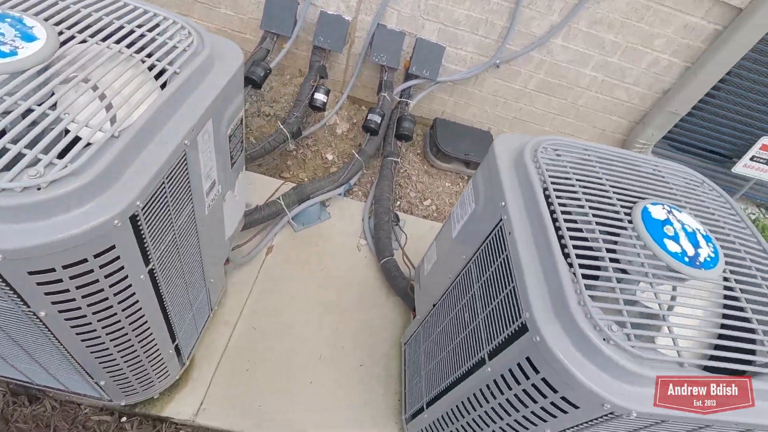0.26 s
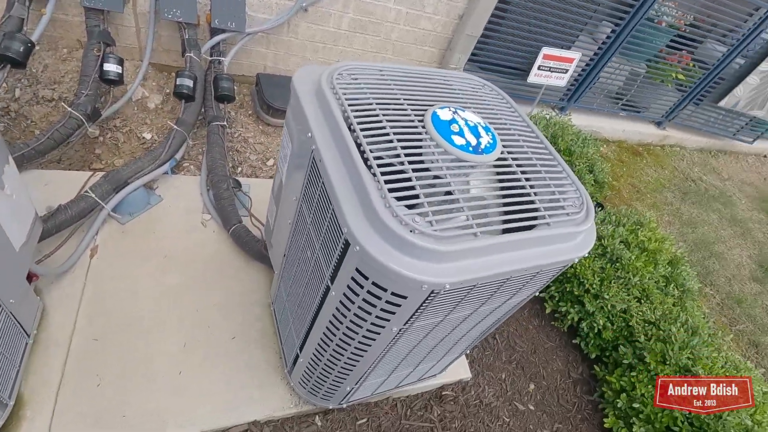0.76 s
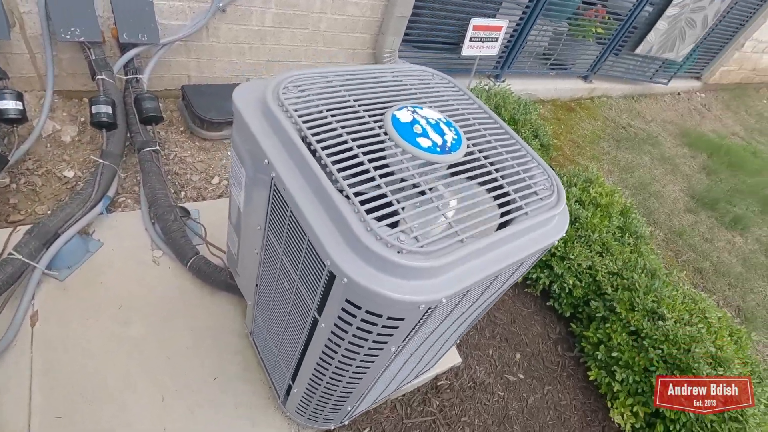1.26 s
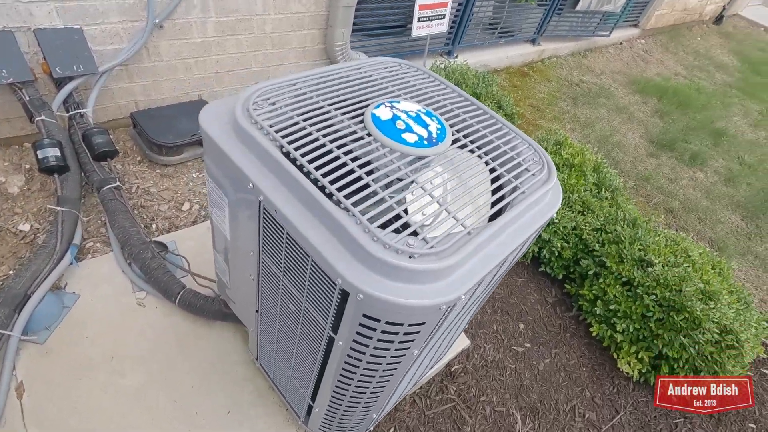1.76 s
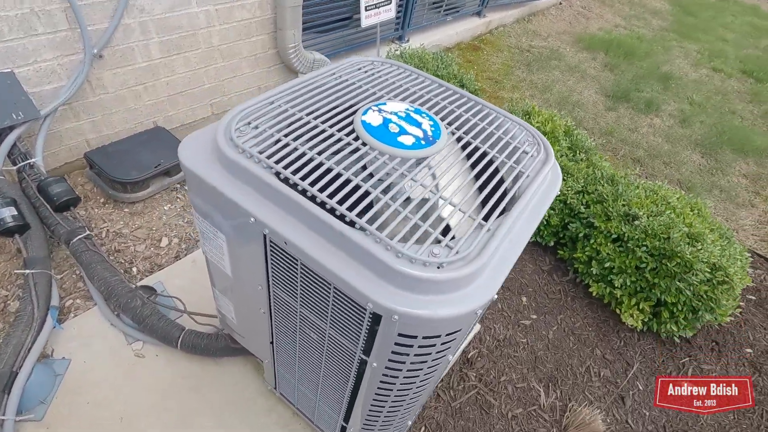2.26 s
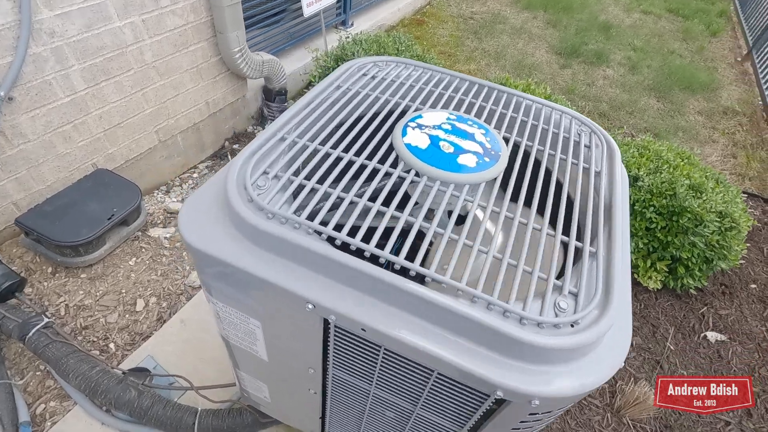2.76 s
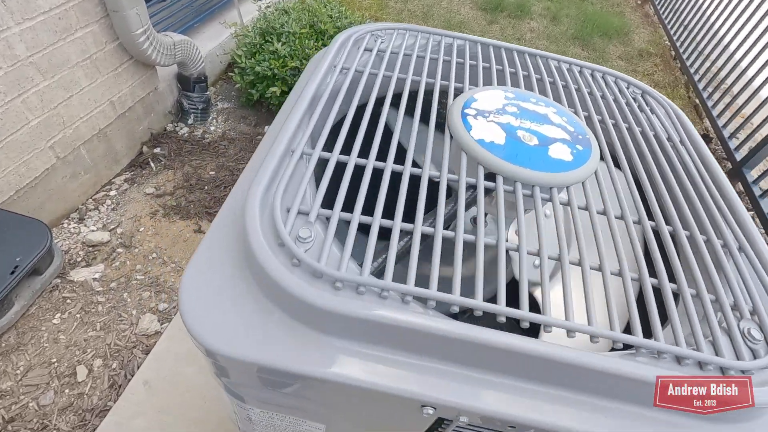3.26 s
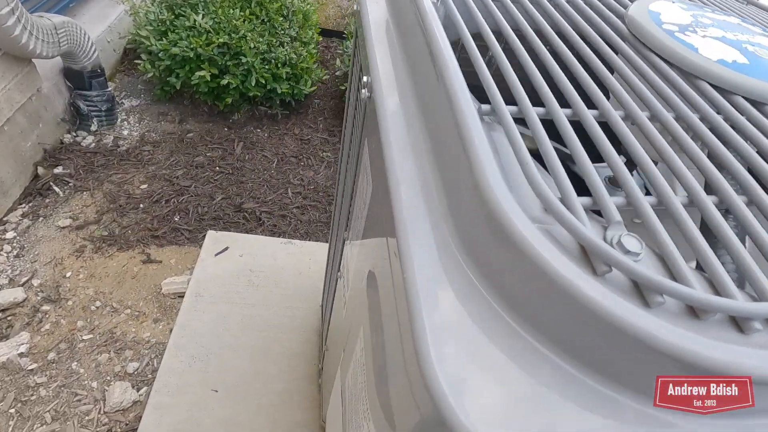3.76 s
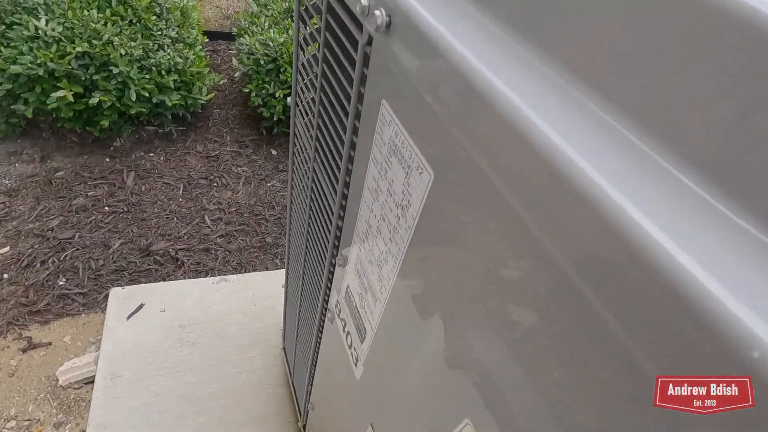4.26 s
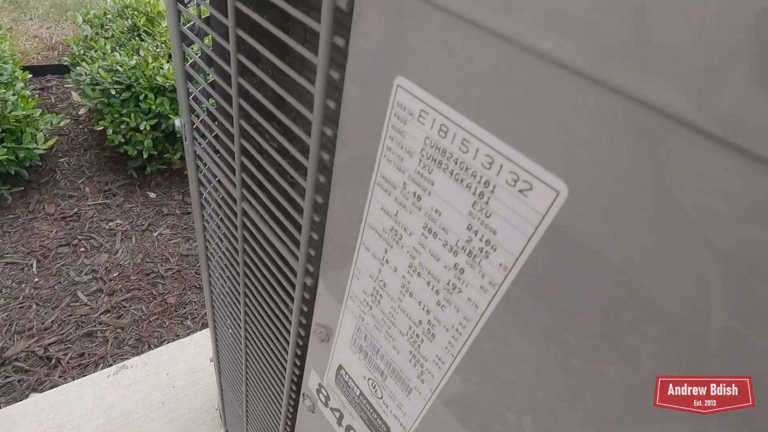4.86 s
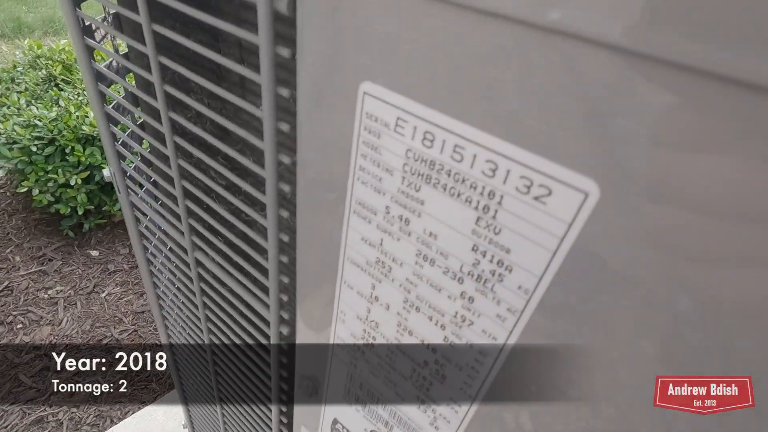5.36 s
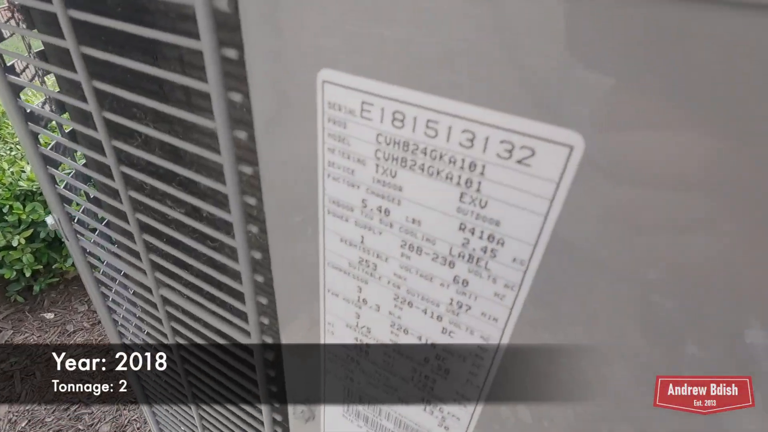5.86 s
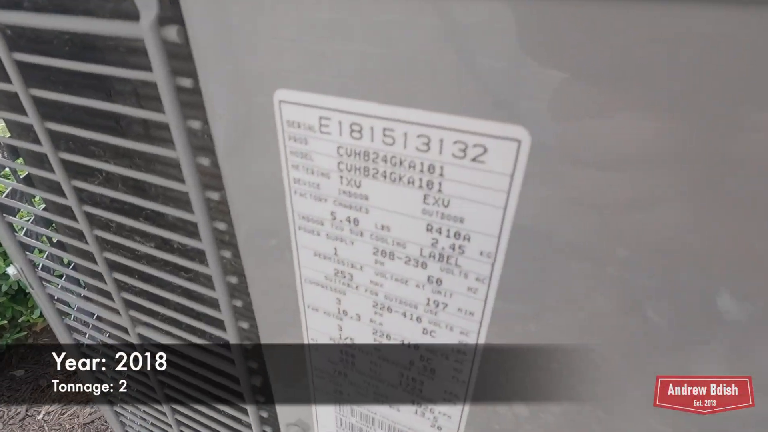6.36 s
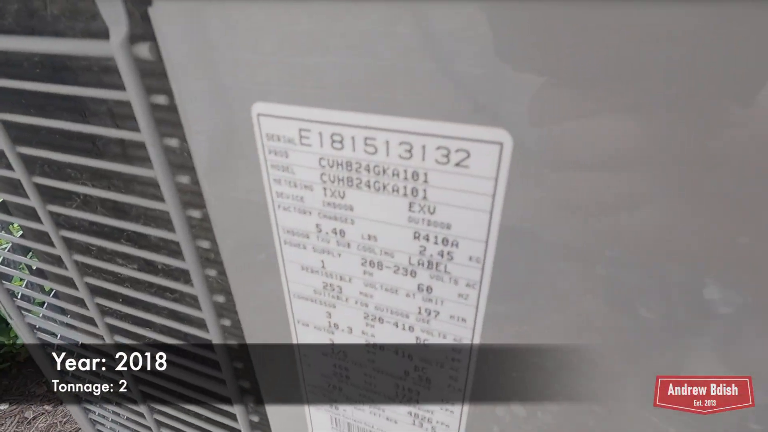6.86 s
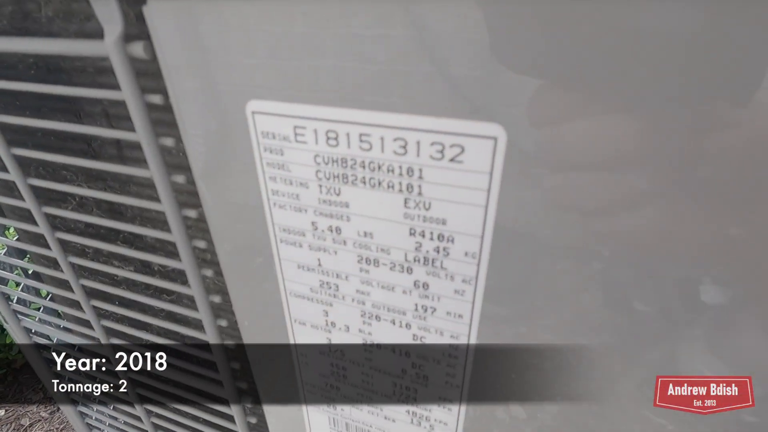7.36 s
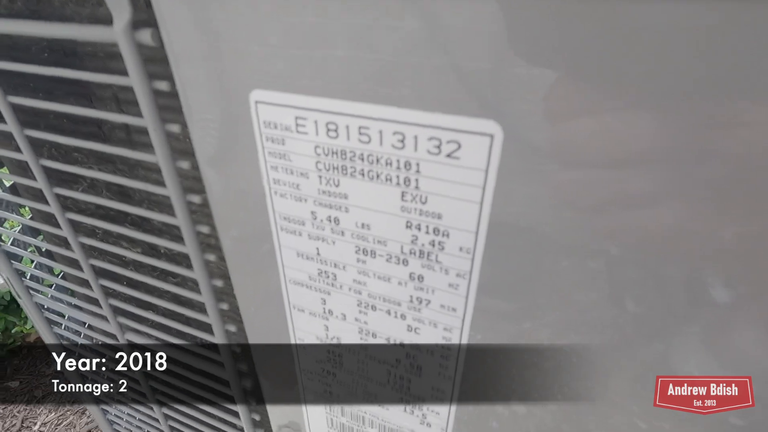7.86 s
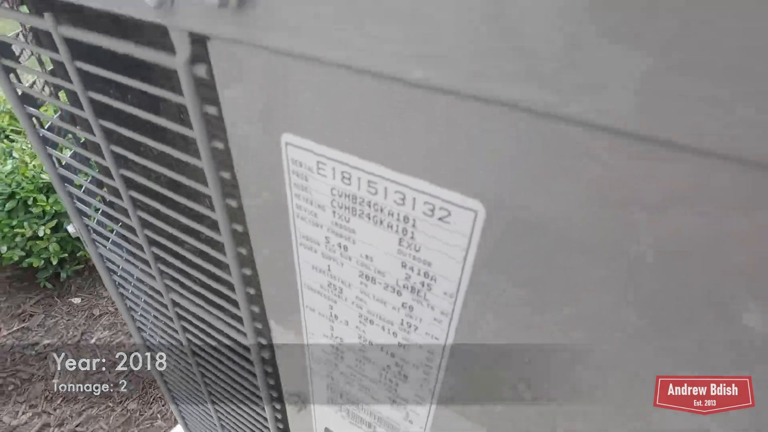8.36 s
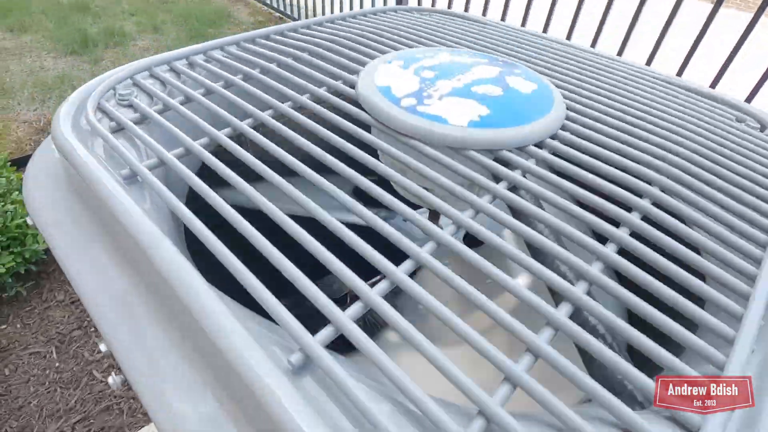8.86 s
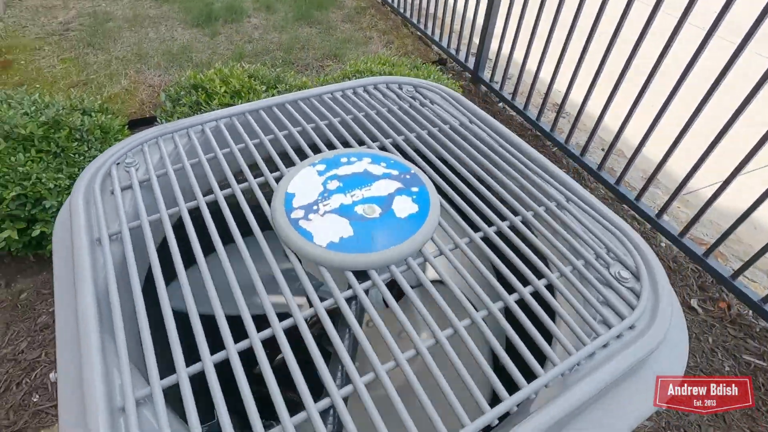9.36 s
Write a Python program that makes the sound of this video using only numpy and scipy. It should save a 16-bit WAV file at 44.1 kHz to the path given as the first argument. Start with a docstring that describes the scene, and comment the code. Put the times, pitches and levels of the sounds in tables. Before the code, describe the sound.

Steady fan drone, rushing air and thin electric whine from an outdoor air conditioner swell as the microphone nears, twice catching its wind.

```python
"""The big fan of an outdoor heat pump thumps and pushes out rushing air. Its compressor hums through
the casing, the electronics that drive the motors whine, and faint ticks come midway. A microphone is
carried across the yard, over the fan grille, down beside the cabinet and over the grille again, and the
outgoing air buffets it twice. In the tables, "yard", "grille" and "cabinet" are the levels heard at
those three places, and "pan" is how much louder the left side is than the right."""
import sys
import numpy as np
from scipy import signal
from scipy.fft import rfft, irfft
from scipy.io import wavfile
from scipy.ndimage import uniform_filter1d, map_coordinates

SR = 44100
rng = np.random.default_rng(int(sys.argv[2]) if len(sys.argv) > 2 else 0)


def digitize_waveform(pressure):
    """Quantize a signal to 16-bit integers and store it at the path in sys.argv[1].

    Rows of a 2-D input are taken as channels; values are limited to [-1, 1].
    """
    field = np.atleast_2d(pressure).T
    bounded = np.clip(field, -1, 1)
    quanta = np.round(bounded * 32767).astype(np.int16)
    wavfile.write(sys.argv[1], SR, quanta)


N = 423801
BLADE_HZ, SHAFT_HZ = 37.493, 43.203  # fan blades passing, and compressor turns, each second

# how loud the machine is along the walk: (time [s], thump level [dB], gain of air and tones [dB])
LOUDNESS = [(0, -51, 0), (.7, -46.5, .5), (1.6, -43.5, 0.5), (2.4, -40.5, .5), (2.8, -33.5, 0.5),
            (3.1, -31.5, 0), (3.8, -24.5, 0.6), (4.3, -24, -1), (4.8, -21.8, 1), (7, -21.5, 1),
            (8.4, -22, -0.5), (8.7, -22.5, 0.2), (8.9, -22, 0.5), (9.05, -23, 0.5), (9.2, -26.5, -2),
            (9.35, -29, -4), (9.61, -31, -4.5)]
# higher notes, relative to the thump: (multiple of BLADE_HZ, yard [dB], grille [dB], cabinet [dB])
OVERTONES = [(2, -5.5, -14, -10.5), (3, -13, -14, -18), (4, -13, -16.5, -26), (5, -4.5, -14, -20),
             (6, -17, -17.5, -19.5), (7, -28, -21, -25), (8, -15, -33, -27), (10, -12, -25.5, -31.5)]
def fan_blades(blade_phase):
    """Each passing blade pushes the air: a deep thump with higher notes in step."""
    thump_db, share = curves(LOUDNESS)[0], places()
    thump = -amp(thump_db + 0.57 * wobble(4.5)) * np.sin(blade_phase)
    overtone_db = np.maximum(thump_db, -42)  # far away, the higher notes stay up while the deepest note fades
    for multiple, *place_db in OVERTONES:
        shaky = np.log(multiple)  # swirling air makes higher notes less steady
        wave = np.sin(multiple * blade_phase + 0.4 * shaky * wobble(4))
        thump += amp(overtone_db + place_db @ share + 0.91 * shaky * wobble(7)) * wave
    return np.sqrt(2) * thump * pan(share.T @ [-.3, -1, -1])


# noise of moving air: (frequency [Hz], yard [dB/Hz], grille [dB/Hz], cabinet [dB/Hz])
AIR = [(20, -86, -70, -79), (55, -67.5, -60, -54), (100, -68.5, -66.5, -57), (175, -66.5, -62, -60),
       (252, -67.5, -63, -62), (455, -73.5, -70, -69.5), (714, -75.5, -71, -72.5),
       (1075, -75.5, -73.5, -76), (1810, -83.5, -81.5, -83), (2390, -88.5, -88.5, -87.5),
       (2930, -86, -85, -86.5), (3460, -91, -91, -91), (4670, -92, -93.5, -93), (5420, -91.5, -92.5, -93.5)]
# hiss around the motor whine: (frequency [Hz], yard [dB/Hz], grille [dB/Hz], cabinet [dB/Hz])
HISS = [(7300, -99, -99, -100), (8560, -105, -104, -107), (9700, -103, -102, -103),
        (9940, -90.5, -91.5, -101), (10680, -105, -106, -110), (11200, -105, -107, -109),
        (12000, -100, -99, -104), (13100, -110, -113, -116), (13400, -118, -123, -131),
        (14200, -111, -111, -116)]
# extra gain for the low rumble: (yard [dB], grille [dB], cabinet [dB])
RUMBLE_DB = [1.5, 1.6, .5]
def rushing_air(blade_phase):
    """Moving air: a rumble that swells with each blade, a broad rush and a fluttering hiss."""
    gain_db, share = curves(LOUDNESS)[1], places()
    rumble = shaped_noise(AIR[:6], LIKENESS, patchy_db=1.5) * (1 + 0.2 * np.sin(blade_phase + 1.25))
    rumble *= amp(gain_db + RUMBLE_DB @ share) * pan(-0.86)
    rush = shaped_noise(AIR[5:] + HISS[:1], LIKENESS, patchy_db=0.85) * pan(share.T @ [-.4, -2.4, -1])
    hiss = amp(0.93 * wobble(4.6)) * shaped_noise(HISS, LIKENESS, patchy_db=1.5) * pan(1.6)
    shaft_phase = 2 * np.pi * SHAFT_HZ * np.arange(N) / SR
    hiss *= 1 + .2 * np.sin(2 * shaft_phase) + .25 * np.sin(4 * shaft_phase)
    return rumble + amp(gain_db + 0.7 * wobble(2.63)) * (rush + hiss)


# compressor notes: (multiple of SHAFT_HZ, yard [dB], grille [dB], cabinet [dB])
COMPRESSOR_NOTES = [(19, -70, -60, -60), (26, -60, -67, -72), (28, -53, -58, -60), (29, -58, -59, -68),
                    (32, -57, -56, -60), (38, -74, -71, -64), (40, -66, -69, -66), (49, -72, -67, -59),
                    (52, -72, -71, -71), (61, -76, -74, -68), (62, -69, -74, -74), (63, -63, -68, -72),
                    (64, -65, -71, -82), (65, -65, -70, -66), (66, -63, -64, -58), (68, -70, -72, -79),
                    (69, -67, -71, -71), (92, -77, -85, -72), (100, -69, -78, -80), (104, -63, -75, -73),
                    (106, -68, -86, -80), (107, -69, -74, -81), (108, -68, -77, -84), (110, -64, -74, -82),
                    (111, -70, -76, -81), (112, -74, -84, -84), (113, -74, -77, -85), (114, -72, -77, -77)]
def compressor():
    """The spinning compressor hums through the casing at whole multiples of its turning rate."""
    return wavering_tones([(multiple * SHAFT_HZ, *db) for multiple, *db in COMPRESSOR_NOTES])


# the loudest compressor note: (time [s], level [dB])
RING = [(0.0, -64), (0.4, -71), (0.56, -64), (0.79, -51.5), (1.02, -48.5), (1.37, -57), (1.8, -58),
        (2.17, -81), (2.34, -68), (2.89, -56), (3.06, -67), (3.19, -49.5), (3.37, -60), (3.65, -60),
        (3.82, -50.5), (4.04, -56.5), (4.17, -67), (4.4, -54), (4.93, -58.5), (5.1, -52.5), (5.71, -51),
        (8.43, -53.5), (8.69, -67), (8.85, -55), (9.02, -74), (9.2, -63), (9.36, -68), (9.6, -62)]
def casing_ring():
    """One compressor note, 67 times the turning rate, lands where the casing naturally rings."""
    share, t = places(), np.arange(N) / SR
    phase = 2 * np.pi * 67 * SHAFT_HZ * t + 0.17 * wobble(5.4) + 0.37 * SIDES * wobble(3.07)
    flicker_db = (-0.1 + 0.99 * (1.5 - share[2])) * wobble(9)  # steadier beside the cabinet
    ring = np.sqrt(2) * amp(curves(RING)[0] + flicker_db) * np.cos(phase)
    return ring * pan(share.T @ [-.8, -1.5, .8])


# high, thin notes of the motor drives: (frequency [Hz], yard [dB], grille [dB], cabinet [dB])
WHINE = [(5400, -90, -85, -76), (5626, -71, -76, -76), (5972, -75, -79, -80), (6145, -74, -79, -74),
         (6490, -76, -83, -84), (9848, -82, -83, -83), (9885, -68, -62, -68), (9923, -80, -82, -89),
         (9973, -81, -84, -83), (10010, -68, -65, -76), (10135, -74, -69, -78), (10311, -82, -90, -101),
         (11601, -79, -85, -87), (11773, -76, -81, -83), (11906, -78, -80, -81), (11947, -72, -77, -77),
         (12078, -73, -82, -80), (12118, -73, -76, -77), (12251, -80, -85, -86), (12290, -81, -84, -91),
         (14014, -88, -85, -95), (14139, -89, -84, -89)]
def motor_whine():
    """The motor drives switch their power on and off so fast that it makes a whine."""
    return wavering_tones(WHINE)


# borders between six groups of tones, each leaving the casing in its own direction: (frequency [Hz])
GROUP_HZ = [1900, 2400, 3400, 7000, 10900]
# for each group: (gain [dB])
GROUP_DB = [-0.089, -0.021, -0.65, 0.35, -0.43, 0.95]
# for each group: (pan [dB])
GROUP_PAN = [-1, 2, 0.5, -1, 1, 4.5]
# how far left and right drift out of step in each group: (phase spread [rad])
GROUP_LAG = [0.21, 0.16, 0.34, 0.15, 0.11, 0.35]
# swelling of the hum near 1.3 kHz: (time [s], gain [dB])
HUM_SWELL = [(0, -9), (.55, 1.5), (1.2, 1.5), (1.5, -2), (2.4, -1), (3.2, -0.5), (3.6, -2), (4, 3),
             (4.5, -3), (5, 0), (9, 0), (9.35, -15), (9.61, -15)]
# swelling of the buzz near 4.6 kHz: (time [s], gain [dB])
BUZZ_SWELL = [(0, 0.5), (.4, -1), (.7, 1), (1.5, -.5), (2.25, 1.5), (2.7, -3), (3.2, 4.5), (3.7, 1),
              (5, -1), (6.5, 2), (8.2, 0), (9.61, 1)]
# swelling of the whine near 10 kHz: (time [s], gain [dB])
WHINE_SWELL = [(0, -9), (.35, -5), (.6, 0), (1.15, 2), (1.45, -3), (1.85, -6), (2.2, 0.5), (3, 0.5),
               (3.35, -3.5), (3.95, 3), (4.3, -3.5), (4.8, 3.5), (5.2, -2.5), (6.5, 1), (8.4, -0.5),
               (9.05, 0.5), (9.5, 0), (9.61, -6)]
def wavering_tones(notes):
    """Each tone arrives directly and off a wall; the two add or cancel as the microphone moves."""
    step = 64  # samples between updates of loudness and phase
    share, gain_db = places()[:, ::step], curves(LOUDNESS)[1, ::step]
    moving = 1 - share[2]  # 0 beside the cabinet
    swells = {0: HUM_SWELL, 3: BUZZ_SWELL, 4: WHINE_SWELL}
    swell_db = {group: curves(rows)[0, ::step] for group, rows in swells.items()}
    t, out = np.arange(N) / SR, np.zeros((2, N))
    for hz, *place_db in notes:
        group = np.searchsorted(GROUP_HZ, hz)
        points = rng.standard_normal((4, 100))  # four random curves, read at 8 points a second
        wall_phase, sway, lag, drift = [map_coordinates(row, [t[::step] * 8]) for row in points]
        wall = np.clip(0.22 + moving * (0.098 + 0.45 * hz / 10000), 0, 1)  # high tones waver more
        paths = (1 + wall * np.exp(2.1j * wall_phase)) / np.sqrt(1 + wall ** 2 + 0.27 * wall)
        level_db = place_db @ share + gain_db + GROUP_DB[group] + swell_db.get(group, 0)
        # starting nearly in step, the compressor notes bunch into one pulse a turn
        phase = 0.8 * points[1, 0] + (0.14 + 0.32 * moving) * drift
        phase = phase + GROUP_LAG[group] * SIDES * (lag + points[0, 0])
        shape = amp(level_db + 0.49 * SIDES * sway) * paths * np.exp(1j * phase) * pan(GROUP_PAN[group])
        out += (np.repeat(shape, step, axis=1)[:, :N] * np.exp(2j * np.pi * hz * t)).real
    return np.sqrt(2) * out


# two gusts of outgoing air, one list each: (time [s], level [dB])
GUSTS = [
    [(2.45, -49), (2.68, -49), (2.8, -28.5), (2.87, -35), (2.94, -50), (3.05, -35), (3.15, -53)],
    [(8.84, -33), (8.93, -36), (9.02, -21), (9.2, -22), (9.28, -19.5), (9.33, -29), (9.44, -31.5),
     (9.5, -25.5), (9.61, -23.5)],
]
# for each gust: (pan [dB])
GUST_PAN_DB = [-4.5, -6]
# the deep sound of a gust: (frequency [Hz], relative level [dB/Hz])
GUST_SPECTRUM = [(8, -16), (22, 3), (35, 0.5), (70, -5), (120, -11), (200, -17.5), (400, -34.5),
                 (1000, -65)]
def wind_buffet():
    """Air from the fan hits the microphone openings and makes slow swings of pressure."""
    rows = [(0, -88, 0)]
    for gust, side_db in zip(GUSTS, GUST_PAN_DB):
        faded = [(gust[0][0] - .1, -90), *gust, (gust[-1][0] + .1, -90)]
        rows += [(time, db, side_db) for time, db in faded]
    level_db, pan_db = curves(rows)
    same_everywhere = [(hz, db, db, db) for hz, db in GUST_SPECTRUM]
    swings = shaped_noise(same_everywhere, [(20, .97), (300, .85)], patchy_db=2.0)
    # even out the noise so that the gusts set its loudness
    strength = np.sqrt(np.abs(uniform_filter1d(np.mean(swings ** 2, axis=0), size=2000)))
    return amp(level_db + 3.0) * swings / (strength + 0.12 * strength.mean()) * pan(pan_db)


# faint ticks, about five a second: (time [s], level [dB])
TICKS = [(2.9701, -50), (3.2934, -49), (3.4844, -55), (3.6835, -52), (4.0043, -47), (4.1644, -47),
         (4.19, -53), (4.351, -48), (4.5434, -50), (4.7017, -51), (4.8644, -52), (5.0834, -56),
         (5.6114, -52), (5.7684, -53)]
def ticks():
    """Soft, bright puffs of noise, each at a slightly different pitch."""
    out, t = np.zeros(N + SR), np.arange(SR // 12) / SR
    rise_s, fade_s = 0.0026, 0.097
    for start, db in TICKS:
        hz = rng.uniform(5200, 6200)
        band = signal.butter(2, [.84 * hz, 1.3 * hz], "band", fs=SR, output="sos")
        puff = unit(signal.sosfilt(band, rng.standard_normal(len(t))))
        shape = amp(db - 1.5 - 60 * t / fade_s) * (1 - np.exp(-t / rise_s))
        out[round(start * SR):][:len(t)] += shape * puff
    return out[:N]


# how alike the air sounds on the left and right: (frequency [Hz], likeness [0-1])
LIKENESS = [(60, 0.99), (250, .99), (600, 0.91), (1500, 0.8), (3000, 0.64), (6000, .76), (10000, 0.82),
            (12000, 0.95)]
def shaped_noise(spectra, likeness, patchy_db):
    """Stereo noise whose tone follows the walk, with random louder and softer patches."""
    hz, t, (common, apart) = signal.stft(rng.standard_normal((2, N)), SR, nperseg=2048)
    log_hz = np.log(hz + 1)
    table_hz, *columns = np.transpose(spectra)
    place_db = [np.interp(log_hz, np.log(table_hz), db, left=-140, right=-140) for db in columns]
    level_db = np.transpose(place_db) @ places()[:, np.minimum(t * SR, N - 1).astype(int)]
    patches = uniform_filter1d(rng.standard_normal(common.shape), size=16, axis=0)
    patches = unit(uniform_filter1d(patches, size=3, axis=1))
    alike_hz, alike = np.transpose(likeness)
    angle = np.arccos(np.interp(log_hz, np.log(alike_hz), alike))[:, None] / 2
    pair = np.array([np.cos(angle) * common + side * np.sin(angle) * apart for side in (1, -1)])
    shaped = pair * amp(level_db + patchy_db * patches) * np.sqrt(SR / 2)
    return signal.istft(shaped, nperseg=2048)[1][:, :N]


# where the microphone is; the rest is cabinet: (time [s], yard share [0-1], grille share [0-1])
WALK = [(0, 1, 0), (2.5, 1, 0), (3.1, 0, 1), (4.4, 0, 1), (4.9, 0, 0), (8.3, 0, 0), (8.7, 0, 1),
        (9.61, 0, 1)]
def places():
    """How much of yard, grille and cabinet is heard at each sample."""
    yard, grille = curves(WALK)
    return np.array([yard, grille, 1 - yard - grille])


def curves(rows):
    """Join a table's points with straight lines: one curve for each column after the time."""
    times, *columns = np.transpose(rows)
    return np.array([np.interp(np.arange(N) / SR, times, column) for column in columns])


def wobble(rate):
    """A smooth curve through `rate` random points a second."""
    return map_coordinates(rng.standard_normal(int(N * rate / SR) + 4), [np.arange(N) * rate / SR])


SIDES = np.array([[1], [-1]])  # left, right
def pan(db):
    """Left and right gains that make the left louder by `db`."""
    return amp(SIDES * db / 2)


def amp(db):
    """Turn decibels into a gain to multiply by."""
    return 10 ** (np.asarray(db) / 20)


def unit(x):
    """Scale x to an average strength (rms) of 1."""
    return x / np.sqrt(np.mean(x ** 2))


def scene():
    """Add up all the sounds; the thump and the rumble share one slightly uneven blade beat."""
    blade_phase = 2 * np.pi * BLADE_HZ * np.arange(N) / SR + 0.071 * wobble(6)
    fan = fan_blades(blade_phase) + rushing_air(blade_phase)
    return fan + compressor() + motor_whine() + casing_ring() + wind_buffet() + ticks()


def record(dry, top_hz=14330):
    """The microphone keeps nothing above top_hz."""
    mirrored = np.hstack([dry, dry[:, ::-1]])  # so the ends join without a jump
    kept = np.fft.rfftfreq(2 * N, 1 / SR) < top_hz
    return irfft(rfft(mirrored) * kept, 2 * N)[:, :N]


dry = scene()
out = record(dry)
digitize_waveform(out)
```